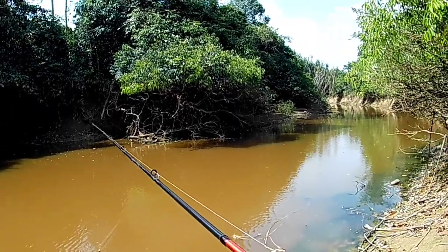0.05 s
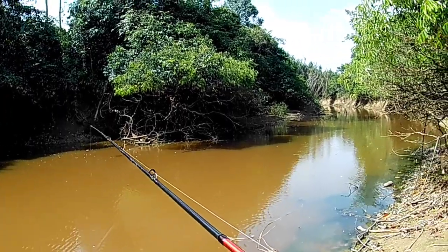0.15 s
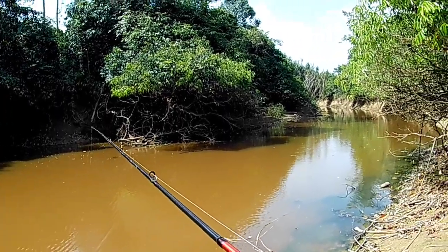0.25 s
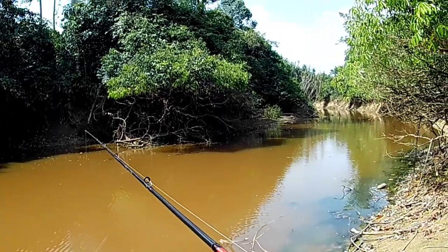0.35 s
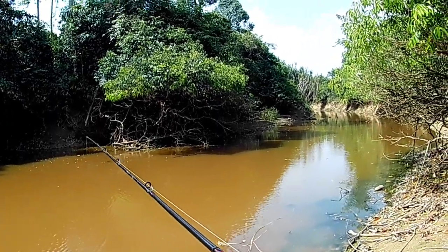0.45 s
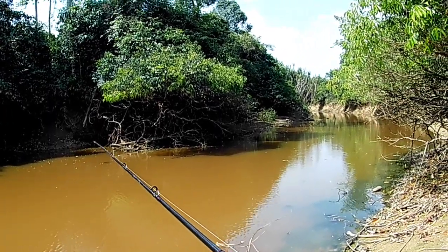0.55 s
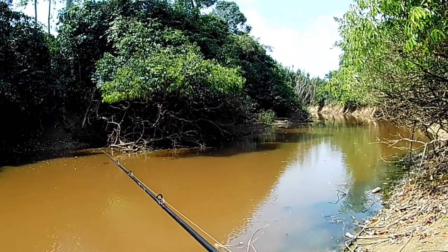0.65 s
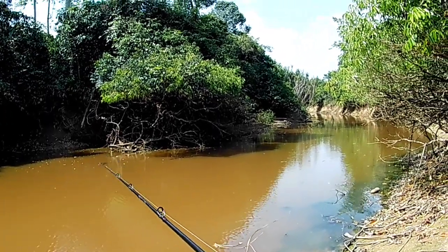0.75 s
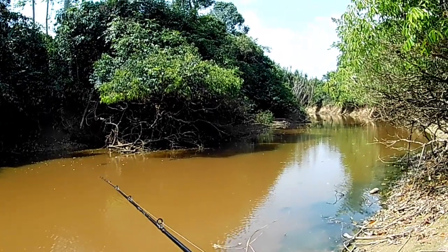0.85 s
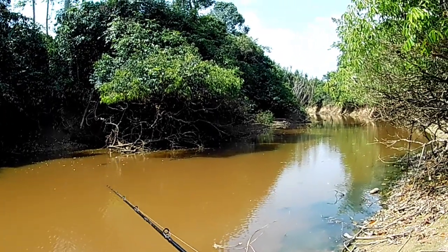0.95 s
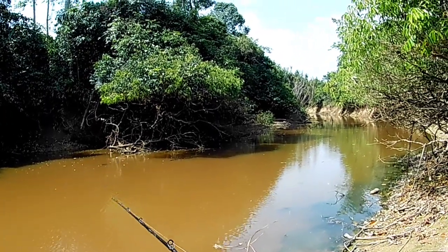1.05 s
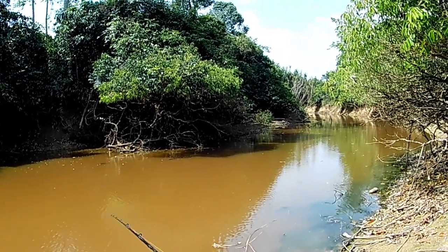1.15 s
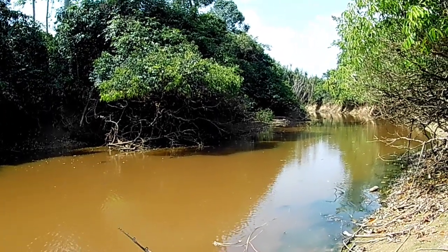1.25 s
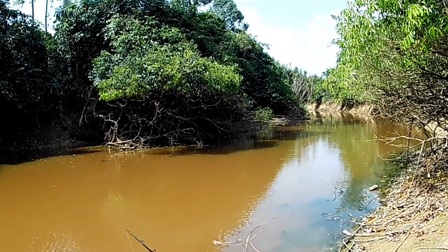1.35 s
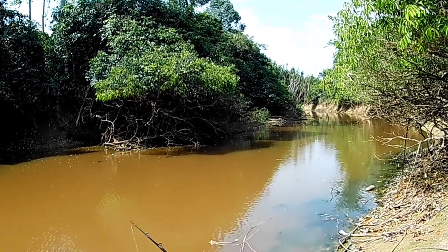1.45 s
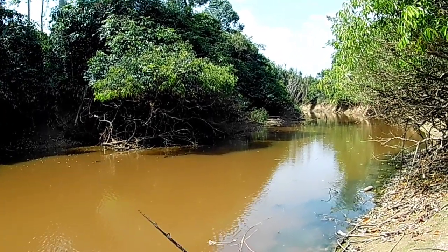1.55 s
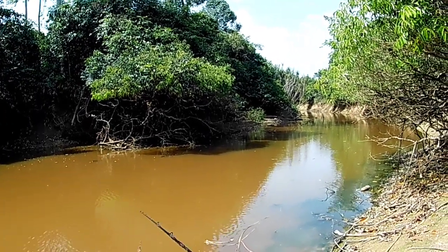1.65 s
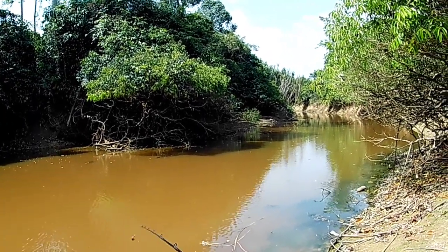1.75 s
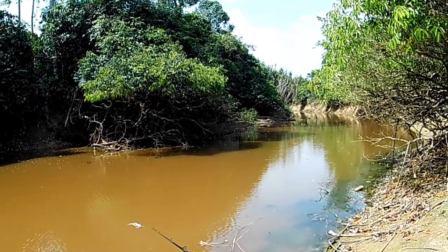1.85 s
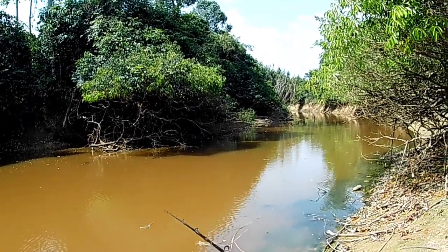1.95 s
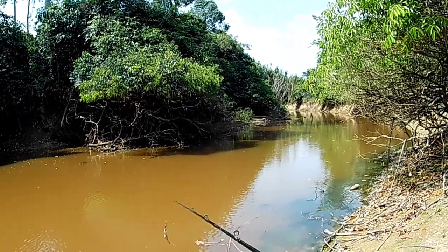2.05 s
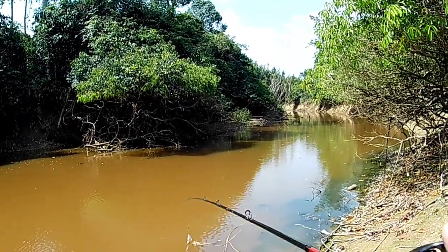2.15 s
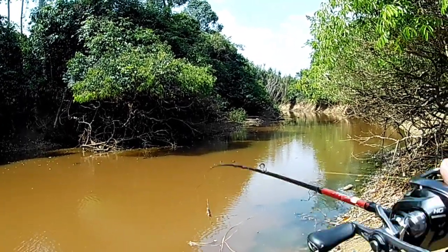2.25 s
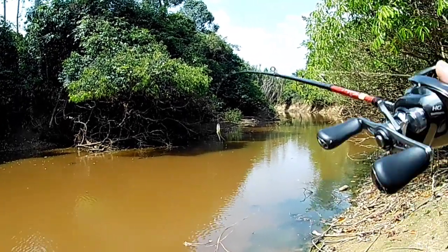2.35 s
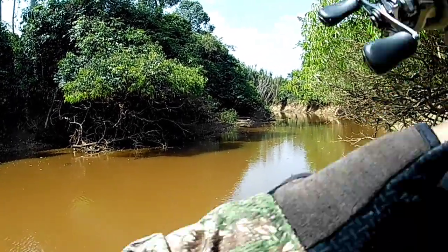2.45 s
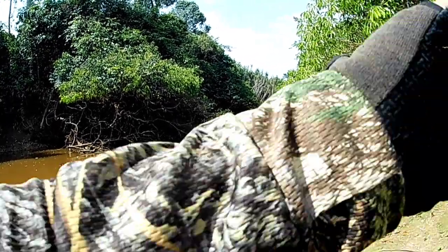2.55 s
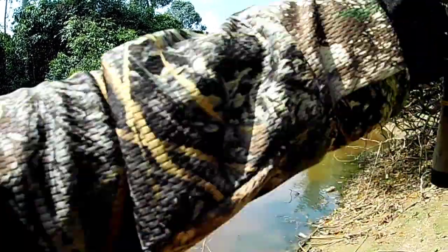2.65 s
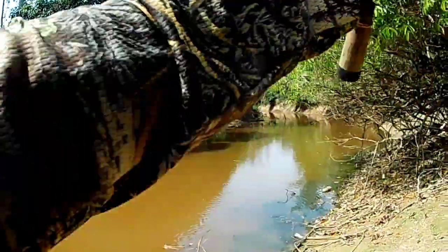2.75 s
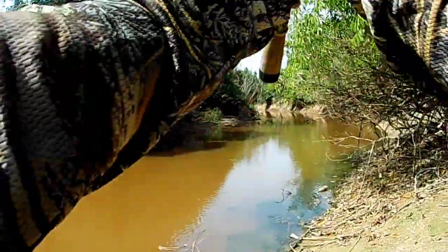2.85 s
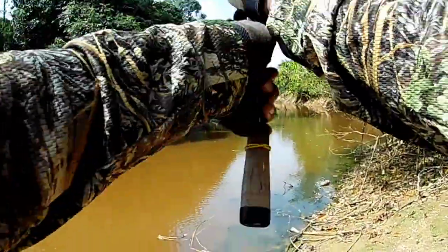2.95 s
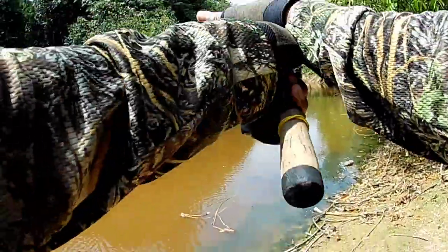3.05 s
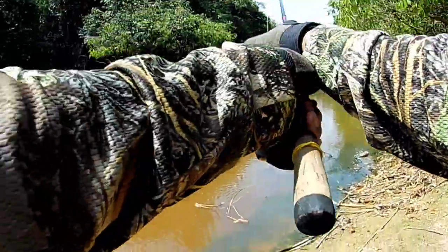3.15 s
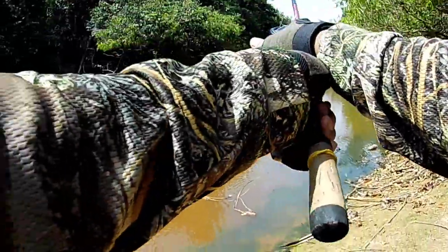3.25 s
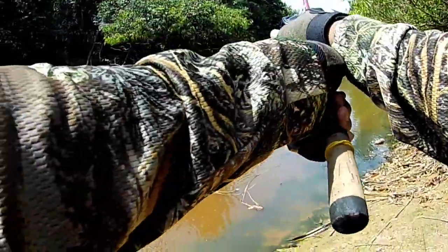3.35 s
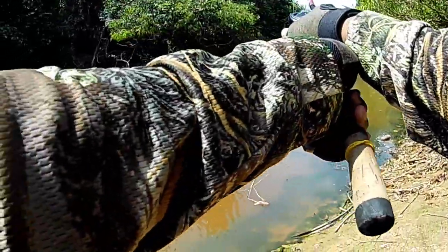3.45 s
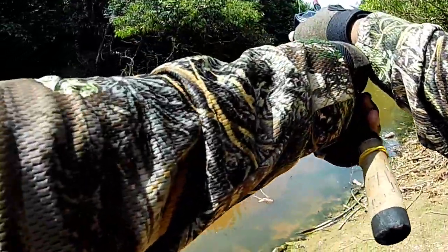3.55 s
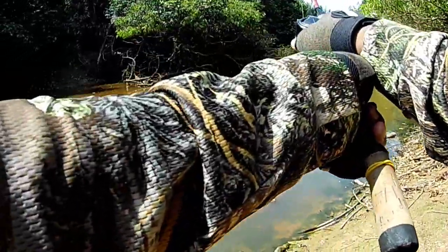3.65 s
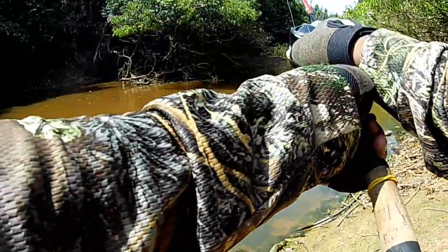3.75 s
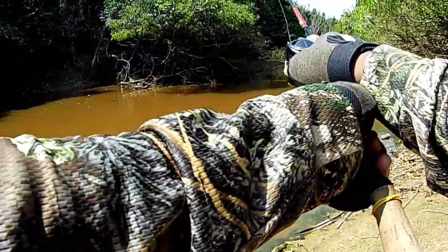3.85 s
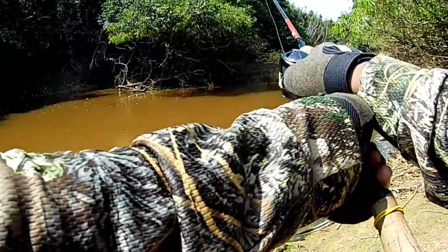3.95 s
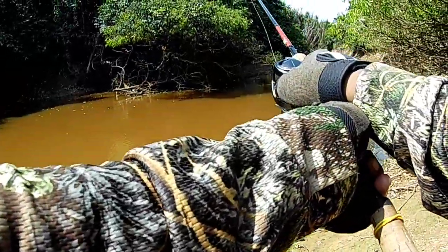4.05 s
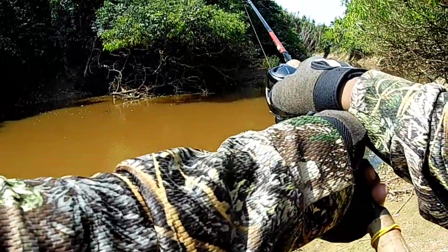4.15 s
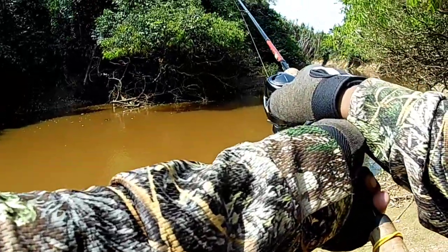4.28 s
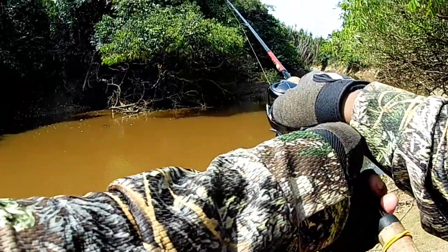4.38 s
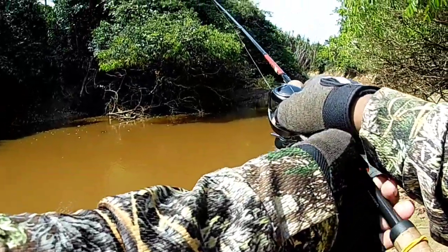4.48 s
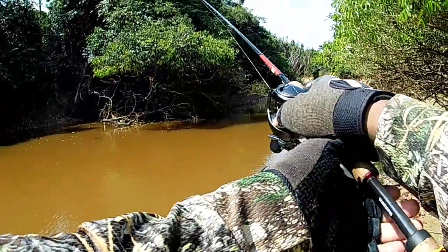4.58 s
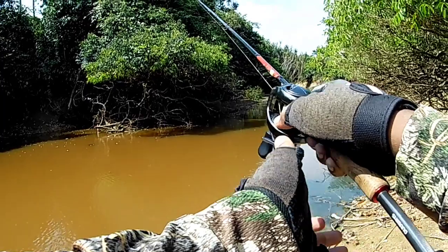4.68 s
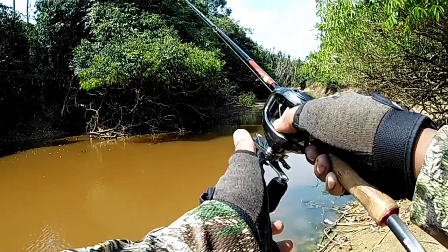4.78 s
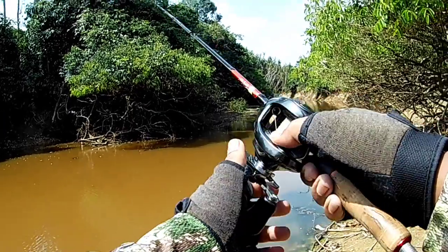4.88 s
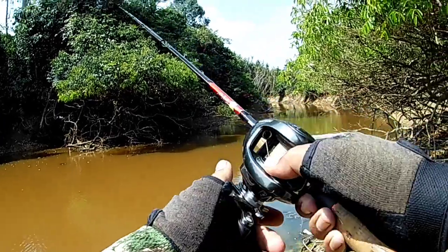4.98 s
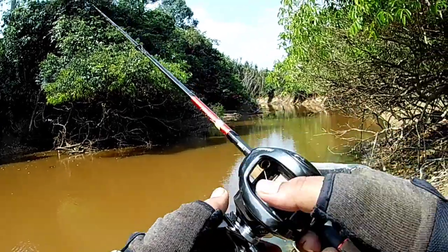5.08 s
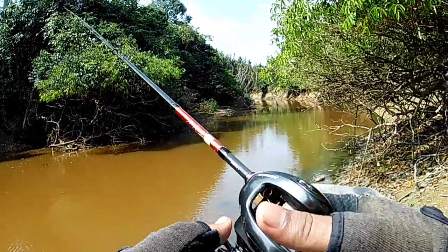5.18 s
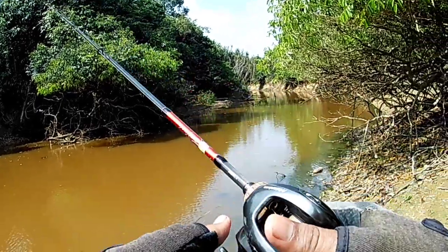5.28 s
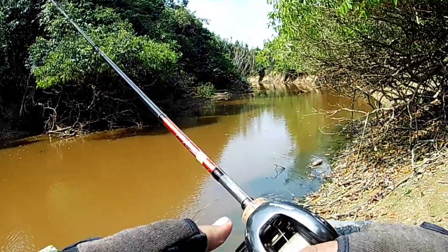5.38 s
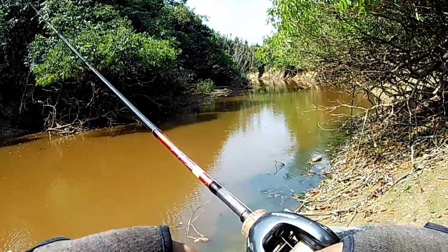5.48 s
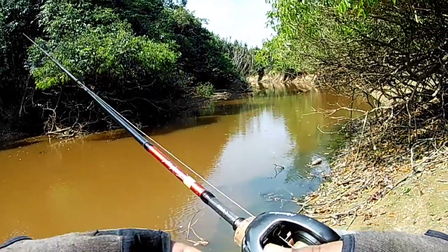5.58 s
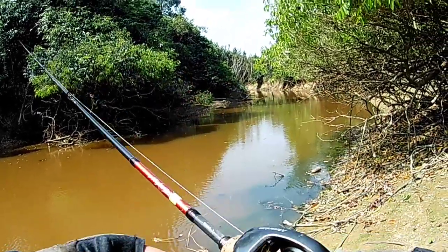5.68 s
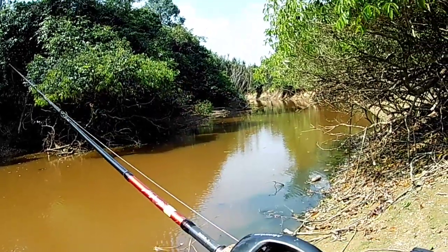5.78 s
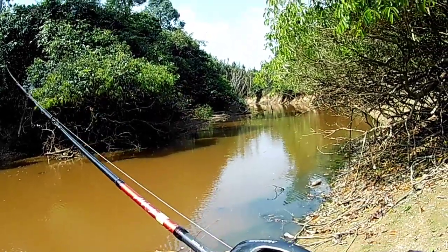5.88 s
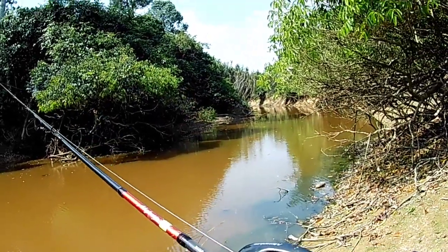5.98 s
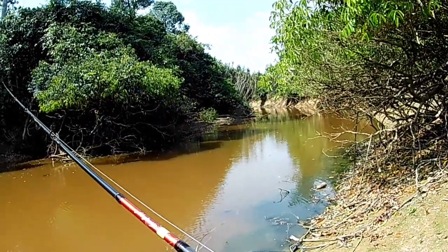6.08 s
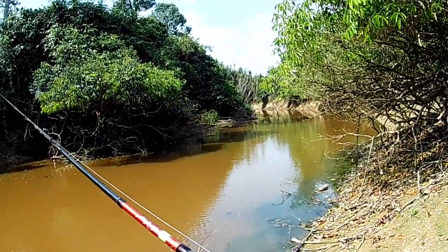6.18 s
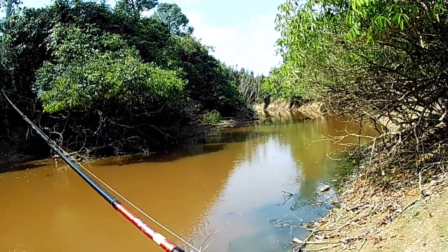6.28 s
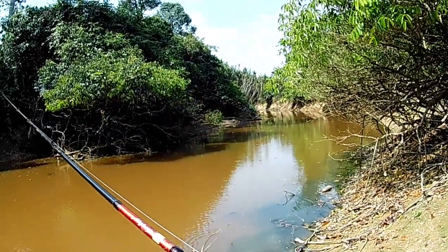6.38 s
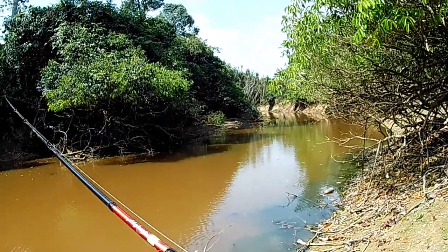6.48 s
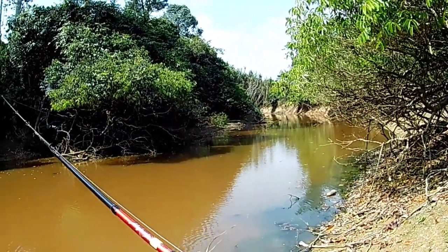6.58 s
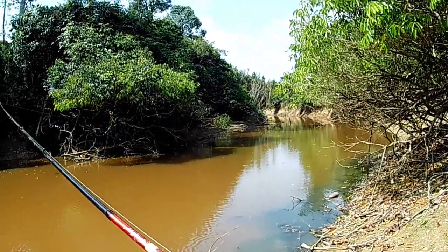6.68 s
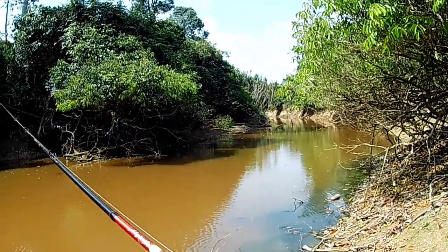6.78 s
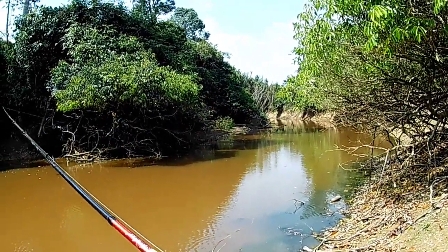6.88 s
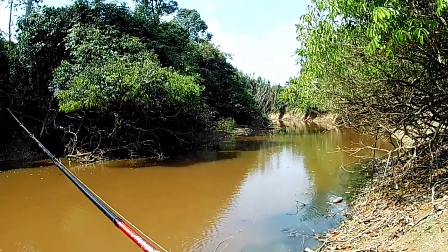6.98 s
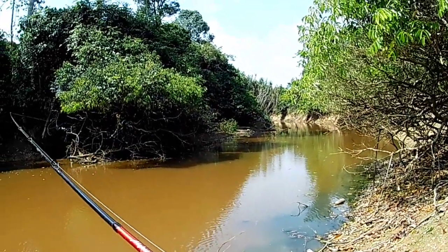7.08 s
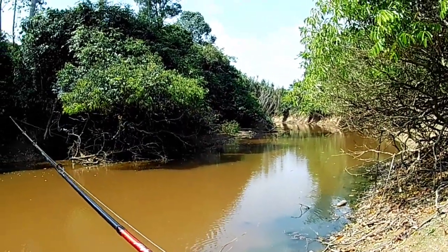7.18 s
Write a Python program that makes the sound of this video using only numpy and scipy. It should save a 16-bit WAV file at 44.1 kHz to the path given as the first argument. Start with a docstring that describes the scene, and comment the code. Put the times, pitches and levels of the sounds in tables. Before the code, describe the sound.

A faint, high, pulsing cicada drone and soft outdoor hiss run throughout, heard from a microphone in a plastic case on an angler's chest. For the first 1.5 seconds a fishing reel hums quietly and line hisses through the rod rings, with a few light ticks. A distant bird whistles four rising notes between 1.8 and 2.6 seconds. At 2.3 seconds the reel's clutch snaps very loudly, and at 2.6 the rod butt knocks the case. Close, boxy sleeve rubbing and dense rattling ticks follow, strongest from 2.7 to 3.1 seconds, then scattered, building again around 4.6. At 5.2 seconds the clutch snaps back in with a loud, bright metallic click. Lighter rustles and ticks come around 5.4 and from 6.1 to 6.4 seconds. The reel's hum stays very faint underneath, and a far bird coos once softly at about 7 seconds.

```python
"""A baitcasting reel's clutch snaps out and back in as a rod is cast from a river bank.
It is heard by a small camera in a plastic case on the angler's chest; sleeves and straps rub and tick
against the case, whose resonances colour them and the snaps. Line hisses through the rod rings and
gears hum. Cicadas drone over outdoor hiss, a far bird whistles four rising notes, another coos once."""
import sys
import numpy as np
from scipy import signal
from scipy.fft import rfft, irfft
from scipy.io import wavfile
from scipy.ndimage import uniform_filter1d

SR = 44100
rng = np.random.default_rng(int(sys.argv[2]) if len(sys.argv) > 2 else 0)


def store_wav(level_fs):
    """Save 16-bit WAV to argv[1]."""
    pcm = np.round(np.clip(np.atleast_2d(level_fs), -1, 1) * 32767)
    wavfile.write(sys.argv[1], SR, pcm.T.astype(np.int16))


N = 318843
T = np.arange(N) / SR


def undb(db):
    """Decibels to gain."""
    return 10 ** (np.asarray(db) / 20)


def unit(x):
    """Scale to rms 1."""
    return x / np.sqrt(np.mean(x ** 2))


def band(x, hz, width_hz):
    """Two-pole resonance, unity gain at centre."""
    return signal.lfilter(*signal.iirpeak(hz, hz / width_hz, SR), x)


def butter(x, order, hz, kind):
    """Causal Butterworth filter."""
    return signal.sosfilt(signal.butter(order, hz, kind, fs=SR, output="sos"), x)


def ring(x, modes):
    """Parallel resonances, neighbours in opposite phase."""
    return sum((-1) ** k * undb(db) * band(x, hz, width_hz) for k, (hz, width_hz, db) in enumerate(modes))


def walk(rate_hz):
    """Slewed random steps, rms 1."""
    hold = int(SR / rate_hz)
    steps = np.repeat(rng.standard_normal(N // hold + 1), hold)
    return unit(uniform_filter1d(steps, hold)[:N])


def add(out, start_s, x):
    """Mix x in from start_s."""
    i = int(start_s * SR)
    out[i:i + len(x)] += x[:N - i]


# Plastic case modes: pitch_hz, width_hz, gain_db
CASE_MODES = [(824, 340, -5), (1226, 92, 7.5), (1550, 125, -2), (1788, 143, 7.5), (2043, 115, 9),
              (2672, 130, 5), (3330, 230, -8), (3690, 200, 6), (4000, 300, -5.5)]
def case(x, direct_db):
    """The case rings; part of the drive passes straight through."""
    return ring(x, CASE_MODES) + undb(direct_db) * x


def muffle(x):
    """The sealed case blocks bass and high treble, and steps down above its last strong mode."""
    x = butter(x, 2, 450, "high")
    x = butter(x, 6, 6000, "low")
    below = signal.sosfiltfilt(signal.butter(16, 4370, fs=SR, output="sos"), x)
    return below + undb(-8) * (x - below)


# Continuous rustle of moving arms: time_s, level_db, dull_db, bright_db
RUSTLE = [(0, -61, -4.5, 2.5), (.9, -61.5, 0, 1.5), (1.55, -63, 1, 3.5), (1.7, -66.5, 0, -9),
          (2.12, -66.5, 1, -7), (2.4, -56, -6, -5.5), (2.66, -49, -0.5, 0.5), (2.9, -42.5, -5, -1.5),
          (3.15, -43, -5, -4), (3.32, -55.5, -8, -3.5), (3.65, -56.5, 4, 1), (3.92, -58.5, -0.5, 3),
          (4.4, -55.5, -2, -0.5), (4.76, -61.5, -4.5, -5), (5.45, -61.5, -2.5, -7), (5.95, -63, -2, -2.5),
          (6.58, -68.5, 5, 0.5), (6.85, -62, -1.5, -2), (7.08, -57.5, -5.5, -3), (7.23, -71, 3, 1)]
# Sleeve or glove strokes on the case: peak_s, rise_s, fall_s, level_db, dull_db, bright_db
SLEEVE_STROKES = [(.26, 0.071, 0.19, -59.5, -11, -3), (0.556, 0.02, 0.031, -44.5, -11, -2.5),
                  (.63, 0.018, 0.03, -58, -11, 5), (.81, 0.021, 0.046, -63.5, 1, 10),
                  (2.293, 0.023, 0.013, -48.5, -1, 7.5), (2.6, 0.084, 0.018, -47, -4, -3.5),
                  (2.634, 0.034, 0.034, -34.5, -12, -24), (2.745, 0.0092, 0.075, -40, -10.5, 2),
                  (2.855, 0.032, 0.027, -35, -4.5, 3), (2.935, 0.012, 0.016, -38, -14, 0),
                  (2.97, 0.035, 0.03, -27.5, -12, -11.5), (3.045, 0.08, 0.056, -33, -9.5, -1.5),
                  (3.096, 0.015, 0.0092, -34, -5.5, -2), (3.22, .05, .06, -63, -11, -13),
                  (4.19, 0.07, 0.11, -52.5, 3.5, 0.5), (4.265, 0.065, 0.055, -58, 9, 5),
                  (4.56, 0.11, 0.018, -44.5, -9, -1), (4.666, 0.16, 0.03, -43, -15.5, -6.5),
                  (4.855, 0.064, 0.055, -45.5, -11, -6.5), (4.98, 0.079, 0.17, -47.5, -9, -2.5),
                  (5.055, 0.079, .04, -54, -2, -10.5), (5.15, 0.052, 0.16, -46.5, -15, -3.5),
                  (5.205, 0.018, 0.034, -36, -1, -8.5), (5.235, .02, 0.024, -63, -4, -2),
                  (5.39, 0.05, 0.061, -59, -11.5, -3), (5.73, 0.042, 0.031, -51.5, -15, -21),
                  (6.12, 0.061, 0.11, -54, -18, -8.5), (6.254, 0.024, 0.019, -46.5, -3, -1.5),
                  (6.23, 0.031, .04, -53, -11, -7), (6.297, .015, .02, -53, -7.5, -10),
                  (6.36, 0.042, 0.048, -51.5, -5, -5.5)]
CRISP_DB, RASP_FROM_S, RASP_DB = -4.5, 4.4, 3
def cloth_pressure():
    """Gains of the dull, middle, bright and crisp bands; rustle and strokes add in power."""
    def band_power(db, dull_db, bright_db):
        return undb([db + dull_db, db, db + bright_db, db + bright_db + CRISP_DB]) ** 2

    time_s, *curves_db = np.transpose(RUSTLE)
    power = band_power(*(np.interp(T, time_s, db) for db in curves_db))
    for peak_s, rise_s, fall_s, *levels_db in SLEEVE_STROKES:
        start_s, end_s = peak_s - rise_s, peak_s + fall_s
        span = slice(int(start_s * SR), int(end_s * SR))
        envelope = np.interp(T[span], [start_s, peak_s, end_s], [0, 1, 0])
        power[:, span] += np.outer(band_power(*levels_db), envelope ** 2)
    gains = np.sqrt(power)
    gains[3, T > RASP_FROM_S] *= undb(RASP_DB)  # hands work the reel
    return gains


def cloth_rub(snaps_per_s=400, snap_db=14):
    """Fibres slip in uneven bursts and stiff ones snap, driving the case; a crisp trace leaks past it."""
    bursts_db = 1.47 * walk(70) + 1.1 * walk(300)
    snaps = (rng.random(N) < snaps_per_s / SR) * rng.standard_normal(N) * undb(snap_db)
    gains = cloth_pressure()
    bands_hz = (400, 1160), (1206, 1937), (2242, 3000), (3114, 5640)
    rub = 0
    for edges_hz, gain in zip(bands_hz, gains):
        slips = rng.standard_normal(N) * undb(bursts_db + 1.56 * walk(40) + 2.2 * rng.exponential(size=N))
        friction = slips + snaps
        rub += gain * unit(butter(case(friction, direct_db=-2.6), 3, edges_hz, "band"))
    leak = gains[3] * unit(butter(friction, 4, (8200, 11000), "band"))
    leak_db = np.where(T > RASP_FROM_S, -42, -33)
    drag = gains[0] * unit(butter(rng.standard_normal(N), 4, (150, 420), "band"))  # cloth shoves the case
    return muffle(rub) + undb(leak_db) * leak + undb(-26.5) * drag


# Line slipping through the rod rings: start_s, end_s, pitch_hz, width_hz, level_db
LINE_SLIPS = [(0, 1.65, 4100, 453, -68), (0, 1.9, 4970, 1000, -68), (0.548, 0.575, 4800, 1280, -54),
              (0.636, 0.659, 4100, 450, -58), (0.81, 0.835, 4050, 300, -58),
              (0.916, 0.976, 5100, 1180, -62), (1.11, 1.184, 5220, 1100, -59),
              (1.088, 1.175, 4070, 400, -62), (1.487, 1.537, 4000, 400, -59),
              (1.498, 1.539, 4760, 800, -59), (3.078, 3.107, 5050, 504, -51.5),
              (3.232, 3.265, 5150, 400, -59)]
def line_hiss():
    """Braid on the rings: narrow hiss, faint and steady while reeling, plus short puffs."""
    out = np.zeros(N)
    for start_s, end_s, hz, width_hz, db in LINE_SLIPS:
        n = int((end_s - start_s) * SR)
        noise = rng.standard_normal(2 * SR)
        hiss = unit(band(band(noise, hz, width_hz), hz, width_hz))[-n:]
        add(out, start_s, undb(db) * signal.windows.tukey(n, .5) * hiss)
    return out


# Reel turning: time_s, level_db
GEAR_LEVELS = [(0, -65), (.1, -64), (.18, -71), (.28, -61.5), (.4, -68), (.6, -62), (.72, -70), (.87, -59),
               (1.05, -66), (1.23, -63.5), (1.35, -68), (1.5, -81), (1.62, -70)]
def gear_hum():
    """Gears hum unevenly in three narrow resonances; the last level holds to the end."""
    hum = sum(undb(db) * band(rng.standard_normal(N), hz, width_hz)
              for hz, width_hz, db in ((837, 35, 0), (1010, 65, -3.5), (2400, 90, -6)))
    level_db = np.interp(T, *np.transpose(GEAR_LEVELS)) + 2.2 * walk(13)
    return undb(level_db) * unit(hum)


# Cicada muscle rate: time_s, rate_hz
MUSCLE_RATE = [(0, 19.05), (1.5, 19.1), (2.5, 19.6), (3.8, 20), (5.5, 19.6), (7.23, 19.8)]
# Three rib bucklings a cycle, each a high then a lower pulse: phase_cycles, level_db, pitch_hz
RIB_PULSES = [(0.0, -6, 7350), (.04, -5, 6900), (.2, 0, 7350), (.245, -.5, 6900), (.43, 0, 7350),
              (.47, -.5, 6900)]
# Far chorus bands: pitch_hz, width_hz, gain_db
CHORUS_BANDS = [(6868, 184, 6.5), (7295, 290, 6.5), (8380, 170, -28), (9020, 140, -7), (10730, 140, -10.5)]
# Whole drone: time_s, level_db
CICADA_LEVELS = [(0, -59.5), (2.5, -58.5), (2.801, -65.5), (3.099, -62), (3.4, -59), (4.3, -60.5),
                 (5.3, -60), (7.23, -58)]
def cicadas(chorus_db=0.5, pulse_cycles=.045):
    """A near cicada buckles its ribs in turn each muscle cycle; far ones blur into a wavering band."""
    cycles = np.cumsum(np.interp(T, *np.transpose(MUSCLE_RATE))) / SR
    near = 0
    for phase, db, hz in RIB_PULSES:
        age = ((cycles - phase + .005 * walk(20)) % 1) / pulse_cycles
        envelope = undb(db + 1.1 * walk(11)) * age * np.exp(-age ** 2)
        near += envelope * np.sin(2 * np.pi * np.cumsum(hz + 95 * walk(30)) / SR)
    far = ring(ring(rng.standard_normal(N), CHORUS_BANDS), CHORUS_BANDS) * undb(0.75 * walk(32))
    drone = unit(unit(near) + undb(chorus_db) * unit(far))
    return undb(np.interp(T, *np.transpose(CICADA_LEVELS))) * drone


# Background spectrum: frequency_hz, density_db
HISS_SPECTRUM = [(24, -30), (40, -18), (86, -24), (173, -15), (298, -7), (600, -6), (850, -8.5),
                 (1800, -3.5), (4200, -10), (4500, -15), (6100, -14), (8300, -17.5), (9200, -33),
                 (10600, -47.5), (15000, -40)]
def outdoor_hiss(level_db=-60.5):
    """Steady hiss of leaves and water, with artificial level flicker per octave below the top band."""
    hz, db = np.transpose(HISS_SPECTRUM)
    bins_hz = np.maximum(np.fft.rfftfreq(N, 1 / SR), 1)
    spectrum = rfft(rng.standard_normal(N)) * undb(np.interp(np.log(bins_hz), np.log(hz), db))
    octave = np.clip(np.log2(bins_hz / 125), 0, 7)
    shared_db = .6 * walk(1.8)
    out = 0
    for k in range(8):
        flicker_db = (k < 7) * (shared_db + 2.1 * walk(7.1) + 1.15 * walk(24))
        weight = np.clip(1 - abs(octave - k), 0, 1)
        out += undb(flicker_db) * irfft(spectrum * weight, N)
    return undb(level_db) * unit(out)


# Buckles, rod butt and cloth ticking on the case: start_s, level_db, pitch_hz, crack_db
CASE_TICKS = [(0.487, -38.5, 2410, -20.5), (0.539, -41, 2300, 1), (0.5515, -32.5, 1870, -5),
              (0.555, -36.5, 1070, 3), (0.634, -33, 4080, -20), (0.812, -40, 4050, -20),
              (0.939, -39, 2260, -10.5), (2.214, -41, 2510, -8), (2.635, -29, 1950, -10),
              (2.7395, -23.5, 2360, -8), (2.743, -23.5, 2010, -4), (2.749, -29, 2600, 2),
              (2.78, -31, 2600, -2), (2.835, -28, 2600, -8), (2.8428, -17.5, 2660, 1),
              (2.851, -27, 2220, -10), (2.858, -19, 3920, -9), (2.884, -21.5, 930, -5),
              (2.901, -32, 1900, -8), (2.918, -23.5, 2600, -1), (2.926, -20, 2580, -8),
              (2.931, -23, 2500, -11), (2.939, -19, 2540, -10), (2.954, -26, 2000, -10),
              (2.9585, -17.5, 2000, -12), (2.969, -18, 1690, -12), (2.977, -17.5, 1550, -17),
              (2.995, -24, 1490, -8), (3.016, -27, 4040, -10), (3.027, -17.5, 2600, -12),
              (3.052, -20, 2670, -12), (3.058, -19, 2700, -10), (3.073, -21, 2630, -7),
              (3.082, -24, 920, -8), (3.091, -24, 766, -4), (3.0945, -25.5, 760, 6), (3.107, -36, 1000, 11),
              (3.126, -32.5, 717, 3), (3.139, -30.5, 880, -18), (3.158, -36, 770, 2), (3.192, -29, 800, 2),
              (3.208, -33, 765, -10), (3.241, -35, 910, -8), (3.247, -31, 910, 1), (3.264, -42, 730, -10),
              (3.275, -39, 730, -10), (3.29, -39.5, 2030, 8.5), (3.333, -37, 2240, -2),
              (3.386, -35, 2140, -11), (3.531, -31.5, 1430, 6), (3.591, -38, 655, 7),
              (3.612, -40, 2000, 11), (3.639, -23.5, 1950, -3), (3.641, -32, 770, -7),
              (3.697, -35, 2550, 2), (3.711, -29, 2540, -14), (3.719, -26, 2670, -19),
              (3.743, -32, 627, -15), (4.064, -40.5, 2300, 12.5), (4.108, -40, 3400, 7.5),
              (4.166, -41, 736, 4), (4.186, -34, 2930, -8), (4.388, -35.5, 2050, 10),
              (4.456, -38, 2010, -3), (4.494, -31, 2230, 7.5), (4.520, -30, 2640, -9),
              (4.55, -34, 2050, -4), (4.583, -27.5, 2000, -17), (4.608, -22.5, 1870, -27),
              (4.6105, -27, 1950, -10), (4.618, -30, 1800, -15), (4.625, -30, 1900, -15),
              (4.632, -33, 2050, -15), (4.64, -33, 2000, -15), (4.651, -33, 1950, -8),
              (4.657, -28, 1900, -15), (4.663, -27, 1970, -12), (4.845, -22, 2020, -6),
              (4.855, -33, 2070, -7), (4.962, -36, 1900, -16), (4.99, -29, 1970, -14),
              (5.003, -30.5, 1950, 1.5), (5.13, -37.5, 2010, 8), (5.158, -38, 1900, 2),
              (5.375, -38, 1940, -4), (5.388, -34, 1850, -6), (5.424, -44, 2070, 6), (5.455, -41, 2080, -6),
              (5.522, -42, 1730, -2), (5.728, -43, 2054, -15), (6.0925, -35, 1270, 7.5),
              (6.094, -35, 1920, -6), (6.138, -47, 1940, -12), (6.21, -44, 1940, -8),
              (6.228, -46, 1940, -8), (6.243, -35, 1940, -8), (6.2545, -31.5, 1160, 1),
              (6.263, -43, 1490, 5), (6.147, -43, 1940, -5), (6.166, -41, 1890, 0), (6.291, -45, 1950, 3),
              (6.331, -39.5, 1900, -1), (6.352, -39, 3700, -2)]
def case_ticks(rattle_at_2khz_s=.00445):
    """A sharp crack opens a knock that dies in a rattle; lower contacts rattle longer."""
    out = np.zeros(N)
    t = np.arange(1500) / SR
    for start_s, db, hz, crack_db in CASE_TICKS:
        fade = np.exp(-t / (rattle_at_2khz_s * (2000 / hz) ** 0.22))
        knock = 4.3 * np.sin(2 * np.pi * hz * t) * np.exp(-t * hz / 2.7) * (1 - np.exp(-t * hz / 0.4))
        rattle = unit(band(rng.standard_normal(len(t)), hz, 0.76 * hz)) * fade
        body = case(knock + rattle, direct_db=11)
        crack = band(rng.standard_normal(len(t)), 2360, 2400) * fade ** 3.6
        tick = body / np.abs(body).max() + undb(crack_db) * crack / np.abs(crack).max()
        add(out, start_s, undb(db) * tick)
    return muffle(out)


# Four whistles, one coo: start_s, end_s, start_hz, end_hz, level_db
BIRD_NOTES = [(1.76, 1.808, 1638, 1644, -60), (1.95, 2.07, 1717, 1726, -61),
              (2.197, 2.258, 1835, 1828, -54.5), (2.528, 2.61, 1855, 1885, -47.5),
              (7.05, 7.11, 852, 845, -60)]
def birds(echo_s=.06, echo_db=-7):
    """Soft gliding tones with an echo off the far bank."""
    out = np.zeros(N)
    for start_s, end_s, start_hz, end_hz, db in BIRD_NOTES:
        n = int((end_s - start_s) * SR)
        tone = np.sqrt(2) * np.sin(2 * np.pi * np.cumsum(np.linspace(start_hz, end_hz, n)) / SR)
        add(out, start_s, undb(db) * signal.windows.tukey(n, .6) * tone)
    return out + undb(echo_db) * np.roll(out, int(echo_s * SR))


# Clutch out, rod butt on the case, clutch in: peak_s, level_db, pitch_hz, half_length_ms, rattle_db
HARD_BLOWS = [(2.2716, -20, 3200, 0.36, 5.5), (2.2759, -7.5, 4730, 0.51, -19),
              (2.277, 3.5, 2466, 1.42, -11.5), (2.2791, -11, 1044, 1.85, -6), (2.2812, -24, 2200, 1.4, -2),
              (2.2832, -19.5, 1600, 2.2, -15), (2.6149, -1, 1460, 1.5, -27), (2.6158, -8, 1950, 1.43, -18),
              (2.622, -9, 1690, 1.03, -22), (2.6225, -11.5, 1160, 3.8, -15), (2.617, -20, 370, 3.5, -24),
              (5.171, -31, 2600, 1.6, 2), (5.173, -23, 3420, 1.03, 8), (5.174, -22.5, 1080, 1.8, -6),
              (5.1900, -11.5, 3200, 0.933, 4), (5.1926, -3, 3930, 0.7, -6), (5.1936, -8, 1140, 1.9, 3),
              (5.194, -13.5, 870, 4, -13), (5.1923, -18, 4830, 1.5, -4), (5.195, -23.5, 400, 3.5, -22),
              (5.1974, -3.5, 2410, 1.4, -9), (5.1996, -10, 4770, 0.69, -13), (5.199, -6, 2420, 1.2, -3),
              (5.2015, -12, 1780, 1.5, -6), (5.2035, -24, 1770, 2.2, 2), (5.2062, -16, 1480, 1.5, 0),
              (5.209, -22, 1900, 1.5, 0), (5.2125, -26, 1800, 1.6, -4), (5.2185, -22, 2560, 1, -1)]
# Reel side plate modes: pitch_hz, width_hz, gain_db
PLATE_MODES = [(863, 28, 10.5), (1120, 18, -26), (4120, 320, 3.5)]
def clutch_and_butt_blows():
    """Each blow, a few cycles plus a rattle of loose parts, shakes the case and rings the side plates."""
    drive = np.zeros(N)
    fade = np.exp(-np.arange(900) / SR / 0.0026)
    for peak_s, db, hz, half_ms, rattle_db in HARD_BLOWS:
        half_s = half_ms / 1000
        t = np.arange(-half_s, half_s, 1 / SR)
        contact = np.cos(2 * np.pi * hz * t) * np.hanning(len(t)) ** 2
        rattle = fade * band(rng.standard_normal(len(fade)), 3100, 5200)
        add(drive, peak_s - half_s, undb(db) * contact)
        add(drive, peak_s - 0.868 * half_s, undb(db + rattle_db) * rattle)
    body = case(drive, direct_db=13.74) + undb(7) * ring(drive, PLATE_MODES)
    return undb(-15) * muffle(butter(body, 1, 520, "high"))


# Steel clutch parts striking the frame: peak_s, level_db, pitch_hz
STEEL_CONTACTS = [(5.1897, -45, 9000), (5.1925, -48, 9100), (5.1938, -41, 7100), (5.1966, -45, 10700),
                  (5.1972, -36.5, 8760), (5.1992, -53, 8950)]
# Reel frame modes: pitch_hz, width_hz, gain_db
FRAME_MODES = [(6800, 490, 3), (8500, 150, 2.5), (9250, 400, 0), (10400, 500, -4), (10700, 190, 8)]
def clutch_pings(half_s=.0006):
    """Short bright contacts ring the metal frame as the clutch snaps in."""
    contacts = np.zeros(N)
    t = np.arange(-half_s, half_s, 1 / SR)
    for peak_s, db, hz in STEEL_CONTACTS:
        add(contacts, peak_s - half_s, undb(db) * np.cos(2 * np.pi * hz * t) * np.hanning(len(t)))
    return contacts + undb(15.5) * ring(contacts, FRAME_MODES)


def scene():
    """All sources at one microphone."""
    angler = clutch_and_butt_blows() + clutch_pings() + case_ticks() + cloth_rub()
    return (angler + line_hiss() + gear_hum() + birds() + cicadas() + outdoor_hiss())[None]


def record(dry, clip_level=.955, bass_hz=80, top_hz=15600):
    """The input clips the loudest snap; bass rolls off and the top is cut."""
    clipped = np.clip(dry, -clip_level, clip_level)
    thinned = butter(clipped, 2, bass_hz, "high")
    return signal.sosfilt(signal.ellip(8, .2, 70, top_hz, fs=SR, output="sos"), thinned)


dry = scene()
out = record(dry)
store_wav(out)
```